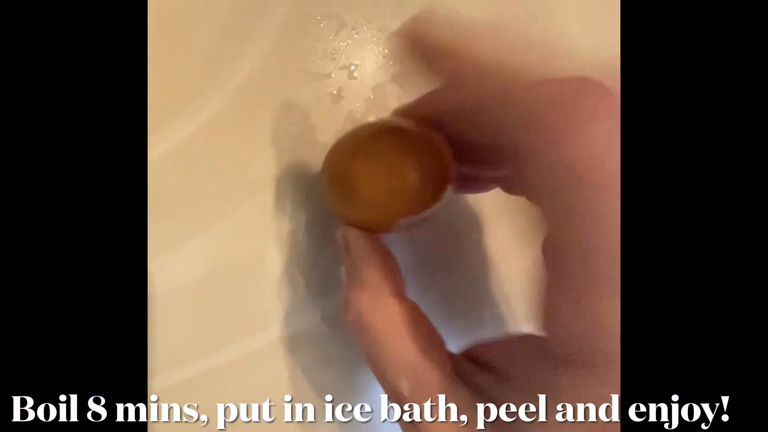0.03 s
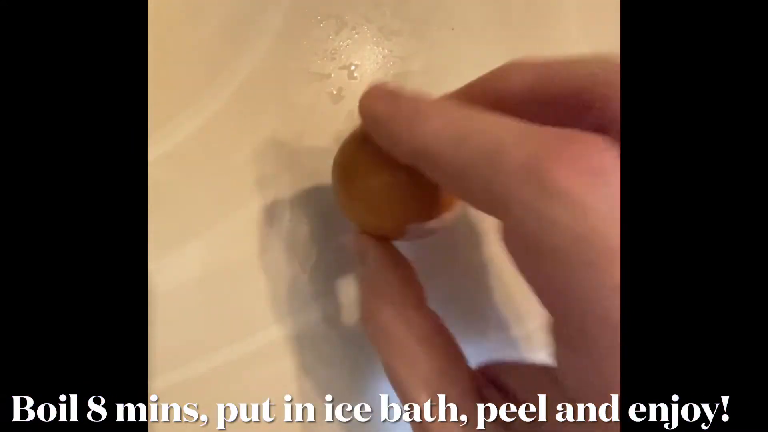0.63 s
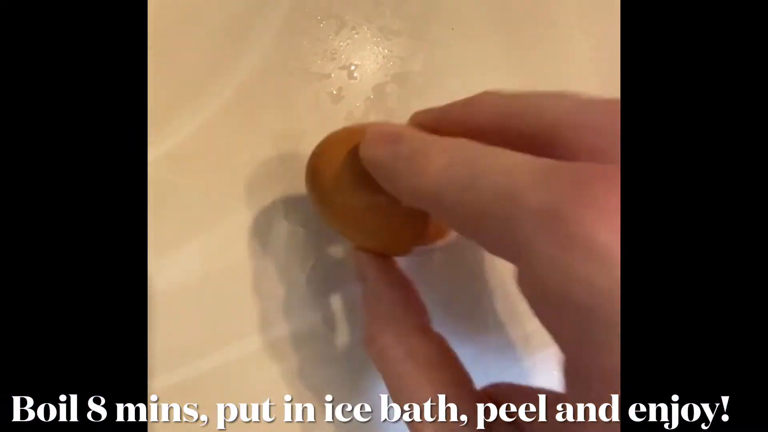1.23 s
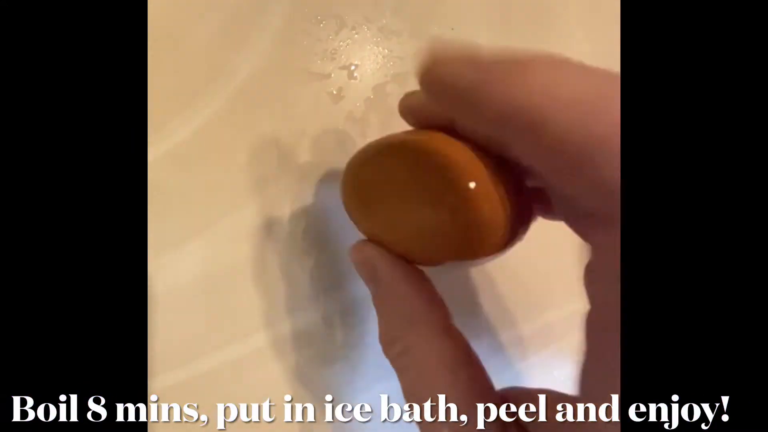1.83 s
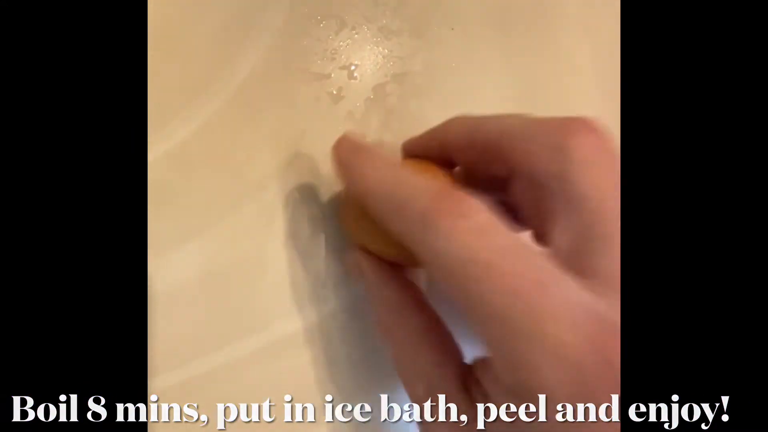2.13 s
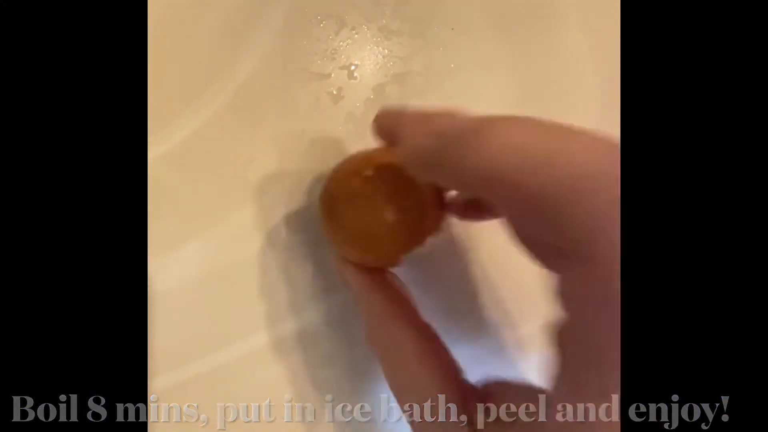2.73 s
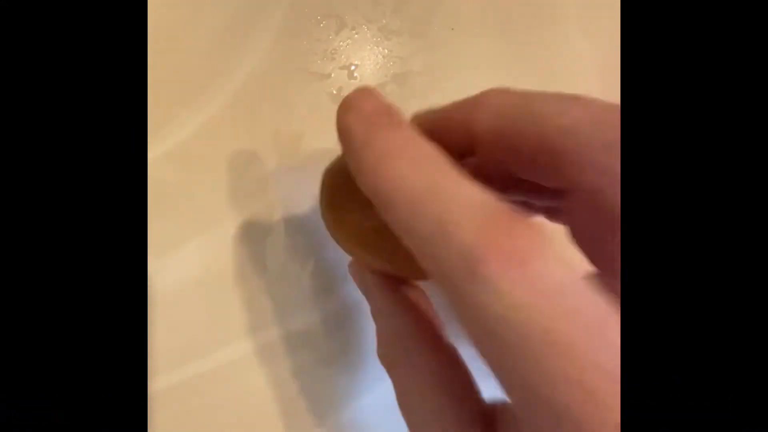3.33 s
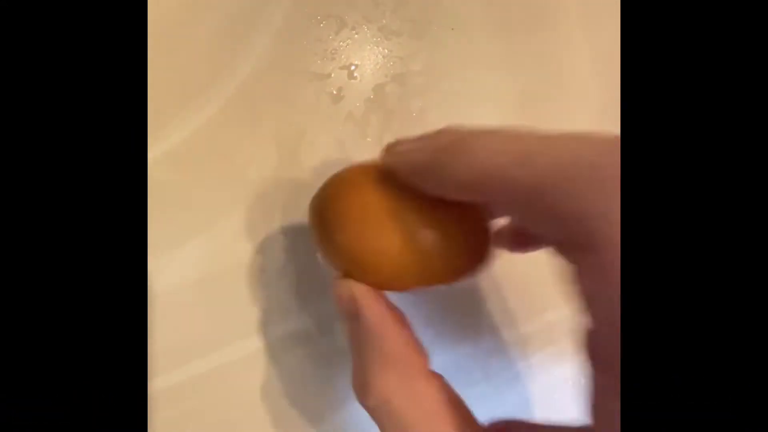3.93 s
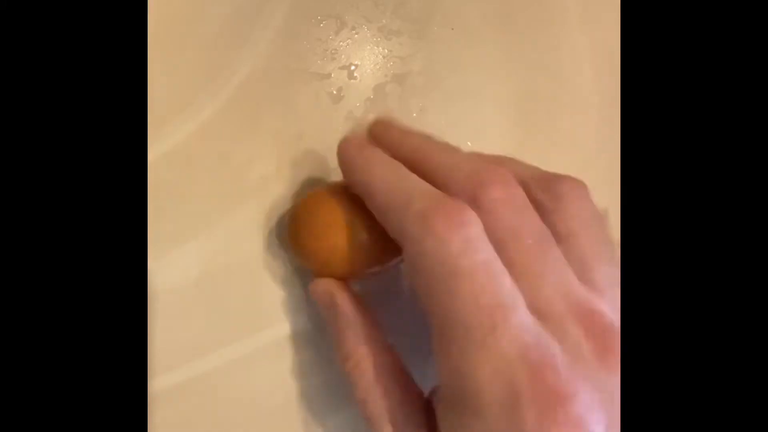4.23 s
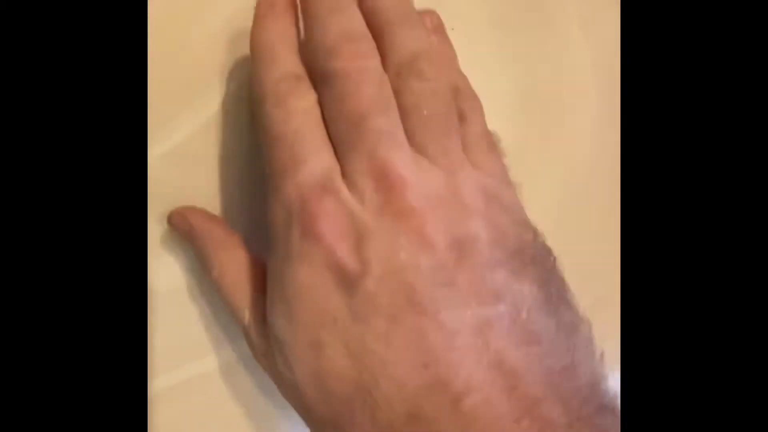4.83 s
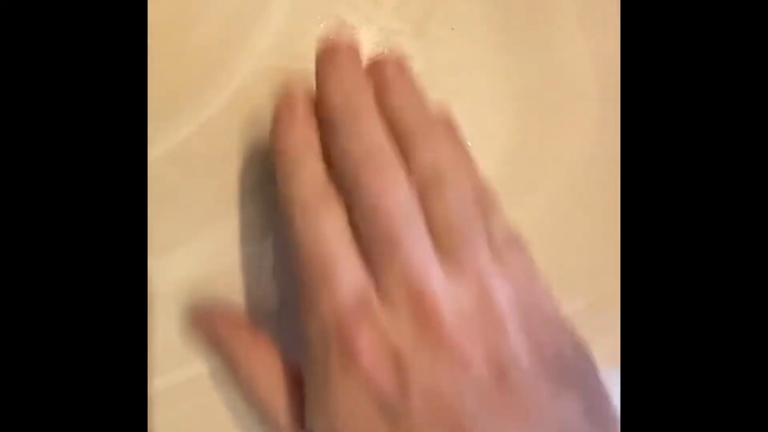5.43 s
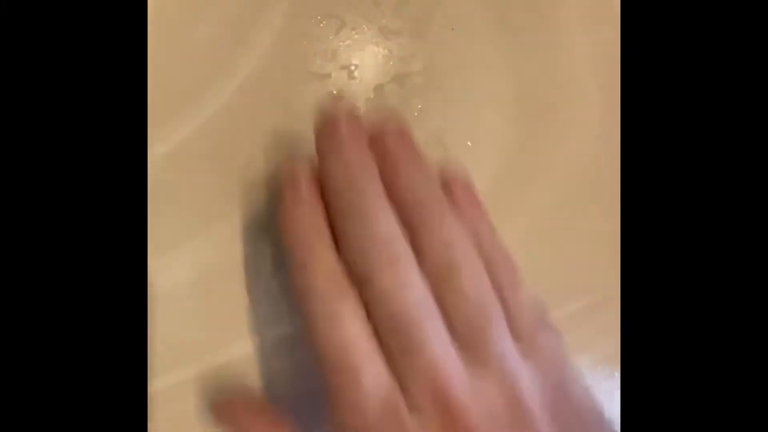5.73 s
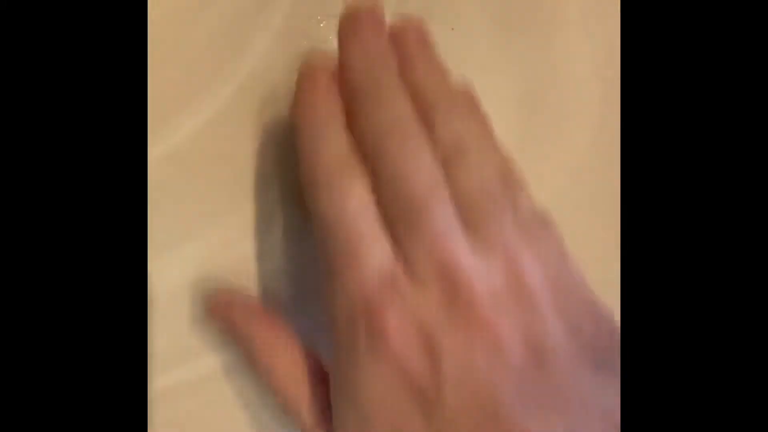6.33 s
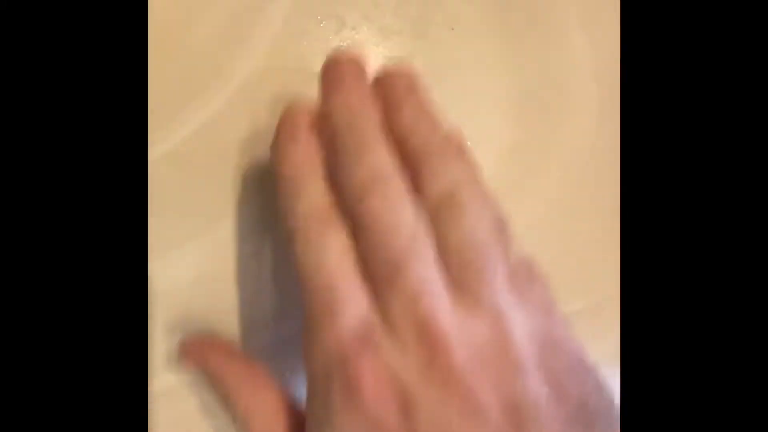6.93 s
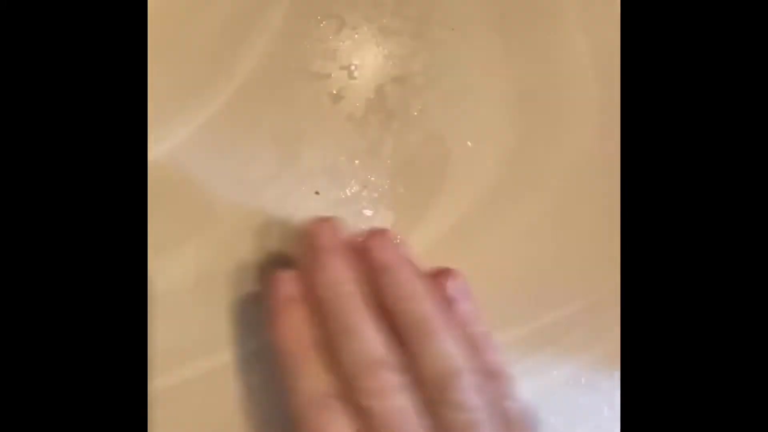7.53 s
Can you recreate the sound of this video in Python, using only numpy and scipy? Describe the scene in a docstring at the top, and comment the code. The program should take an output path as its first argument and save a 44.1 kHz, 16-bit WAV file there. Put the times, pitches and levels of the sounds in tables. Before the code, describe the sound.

A boiled egg is tapped on a stone countertop about five times a second, each tap a sharp crack with a knock and a low thud. The taps soften as the shell gives way. Then a flat hand rolls the egg back and forth, making crisp crunches and small snaps over a faint rumble. It sounds close, with a short kitchen echo and a low hush.

```python
"""Sharp, cracking taps, about five a second, then a rolling crunch: a boiled egg on a stone countertop.
Each tap crushes a patch of shell, knocks on the stone and thuds through the counter.
Once the shell is cracked all over, a flat hand rolls the egg back and forth and breaks it into flakes.
Breaking shell is made of tiny bursts of noise; the knocks and thuds of the taps are fading tones.
A small, hard kitchen echoes it all, over a low, steady hush."""
import sys
import numpy as np
from scipy import signal
from scipy.fft import rfft, irfft, next_fast_len
from scipy.io import wavfile
from scipy.ndimage import uniform_filter1d, map_coordinates

SR = 44100
rng = np.random.default_rng(int(sys.argv[2]) if len(sys.argv) > 2 else 0)


def generate_wav(sig):
    """Save sig (samples, or channels by samples) to the path in sys.argv[1] as 16-bit PCM at SR."""
    pcm = np.round(np.clip(np.atleast_2d(sig).T, -1, 1) * 32767).astype(np.int16)
    wavfile.write(sys.argv[1], SR, pcm)


N = 333837
TIME = np.arange(N) / SR
AGE = np.arange(SR // 3) / SR  # seconds since a hit
PALM_S, PALM_WIDTH_S = 4.506, 0.026  # when the palm settles on the egg, and half the time it takes

# Tone of crunching shell: f/Hz, level/dB
CRUNCH_TONE = [(400, -13), (1000, -2.5), (2200, -3), (3500, 1), (5000, 3), (7500, -0.5), (9500, -6),
               (16000, -28.5)]
# Tone of fine splinters: f/Hz, level/dB
SPLINTER_TONE = [(4000, -27), (7000, 0), (8500, 2), (10300, 2), (13500, 0), (15600, 0.5), (16200, -29)]
# Tone of shell knocking on stone: f/Hz, level/dB
KNOCK_TONE = [(200, -8), (400, -13), (540, 5), (650, 0.5), (800, -18), (1150, -18), (2200, -36.5)]


def taps():
    """In each tap the shell crushes first, the knock follows, and the counter's low thud comes last."""
    # Taps of the egg: t/s, thud/dB, knock/dB, crack/dB, extra treble/dB, shell ring/Hz
    hits = [(-0.03, -21.5, -21.5, -22.5, 3, 4170), (0.1512, -23, -20.5, -21, 2.5, 2970),
            (0.3331, -25.5, -36.5, -25.5, 10.5, 7150), (0.535, -26, -24, -22, 3, 3550),
            (0.7362, -22, -39, -28, 0.5, 3010), (0.9229, -23.5, -21.5, -26, 7.5, 5450),
            (1.109, -21, -17.5, -22, 2.5, 5720), (1.297, -21, -19.5, -25, 5.5, 2490),
            (1.4983, -20, -32, -25, 1, 3280), (1.7048, -28, -30.5, -27.5, 10.5, 7180),
            (1.892, -22.5, -23, -28, 7, 2410), (2.0897, -27.5, -44, -38, 0.5, 6660),
            (2.2726, -24, -27.5, -26, 7, 5250), (2.4535, -21, -23.5, -26, 2, 5560),
            (2.643, -25.5, -31.5, -30.5, 2.5, 5320), (2.8285, -28, -25, -27, 0.5, 3540),
            (3.0247, -24.5, -25, -25, -1.5, 2270), (3.2222, -29.5, -36.5, -28.5, -7, 4640),
            (3.411, -29, -31.5, -23, -1.5, 5370), (3.6018, -32.5, -44, -24.5, -1.5, 2440),
            (3.7817, -34.5, -40, -27.5, 0.5, 5300), (3.9732, -33.5, -43, -24, 2, 3000),
            (4.2392, -45.5, -48, -35, -1.5, 5340)]
    # Tone of the crack: f/Hz, level/dB
    crack_tone = [(300, -29), (750, 7), (1400, 7), (2300, 3), (3500, -0.5), (5500, -0.5), (7500, -0.5),
                  (9000, 0.5), (11000, -4.5), (13500, -1.5), (15200, -2.5), (16500, -23)]
    # Four sets of ringing tones: f/Hz, level/dB, time to fade by 60 dB/s, left over right/dB
    knock_modes = [(549, 9.5, 0.032, -18.5), (616.6, -4, 0.056, -10), (535.9, -22.5, 0.14, 5.5),
                   (677, -12, 0.078, 9)]  # egg on stone
    hand_modes = [(318, 1, 0.045, -25.5), (376.7, -5.5, 0.059, 15.5), (402, -10.5, 0.16, 26.5)]  # hollow of the hand round the egg
    counter_modes = [(80.6, -25.5, 0.22, -18.5), (108.9, 13, 0.041, 4.5), (103.3, -19.5, 0.1, 5.5),
                     (135, -19, 0.3, 6), (169, -19.5, 0.46, 4), (207.6, -19, 0.31, 3),
                     (239.4, -16, 0.37, 4.5), (271.2, -13.5, 0.21, -12.5)]  # low tones of the counter and its cabinet
    slab_modes = [(995, 2, 0.077, 6), (1192, -7, 0.14, -12), (1303, -4, 0.093, 6), (1456, -2, 0.13, -5),
                  (1885, 7, 0.059, -5), (2300, -10.5, 0.19, 1)]  # high tones of the stone slab
    firm_db, firm_crush_s = -23, 0.0023  # a firm tap's thud and crush time
    gives_way_s, giving_s = 3.12, 0.32  # when the shell gives way, and how long that takes
    detune = 0.008
    out = np.zeros((2, N))
    for start, thud_db, knock_db, crack_db, treble_db, shell_hz in hits:
        broken = np.clip((start - gives_way_s) / giving_s, 0, 1)
        force_db = thud_db - firm_db
        crush_s = firm_crush_s * 2 ** min(-force_db / 17.5, 1)  # harder taps crush faster
        clack_db = 0.16 * force_db - 10 * broken  # a broken shell loses its clack
        tilt = [(1800, clack_db), (3000, 0), (7000, 0), (10000, treble_db)]

        def crack_colour(hz):
            caving_patch = 4.9 * bump(hz, shell_hz, octaves=0.15)
            loose_plates = 6.5 * broken * bump(hz, 2176, octaves=0.33)
            return along(crack_tone, hz) + along(tilt, hz) + caving_patch + loose_plates

        breaks = unit_hit(fracture(crush_s, grain_db=1.8, trail_db=-8, trail_t60=0.02))
        crack = amp(crack_db) * stereo(breaks, crack_colour)
        knock = ring(knock_modes, rise_s=0.003, scatter_db=3, detune=detune)
        body = amp(knock_db) * right_late(knock, lag_s=0.00066)
        hand_db = thud_db + 0.33 * (knock_db - thud_db) - 5  # the hand follows both thud and knock
        body += amp(hand_db) * ring(hand_modes, rise_s=0.00046, scatter_db=4, detune=detune)
        thud = amp(thud_db) * ring(counter_modes, rise_s=0.0066, scatter_db=2.5, detune=detune)
        # a broken shell lands softly and thuds deeper
        body += filtered(thud, lambda hz: 1 + broken * amp(1) * resonance(hz, centre=61, q=1.7))
        slab = ring(slab_modes, rise_s=0.0046, scatter_db=8, detune=detune / 2)
        slab *= amp(crack_db + clack_db - 12.5)
        tap = crack + slab + bending_waves(body, lag_s=0.00775)
        add(out, start, kitchen(tap, near_db=11.5, near_t60=0.16, build_s=0.0019))
    return out


def fracture(crush_s, grain_db, trail_db, trail_t60):
    """A run of tiny breaks swells for the crush time, then trails off as the shell settles."""
    t = AGE[:SR // 16]
    swell = (t / crush_s) ** 2 * np.exp(2 * (1 - t / crush_s))
    trail = amp(trail_db - 60 * t / trail_t60) * np.minimum(t / crush_s, 1) ** 2
    unevenness = amp(grain_db * wobble(2540, len(t)))
    breaks = (swell + trail) * unevenness * rng.standard_normal((2, len(t)))
    return np.pad(breaks, [(0, 0), (0, len(AGE) - len(t))])


def ring(modes, rise_s, scatter_db, detune):
    """A struck object's fading tones; each contact point gives them new strengths and shifts them a bit."""
    out = 0
    for hz, db, t60, balance_db in modes:
        wave = np.sin(2 * np.pi * hz * (1 + detune * rng.normal()) * AGE)
        fade = amp(db + scatter_db * rng.normal() - 60 * AGE / t60)
        out = out + sides(balance_db)[:, None] * wave * fade
    onset = 1 - np.exp(-(AGE / rise_s) ** 2)
    return unit_hit(out * onset)


def bending_waves(x, lag_s):
    """The lower a wave, the slower it travels through the slab; lag_s is the delay at 100 Hz."""
    return filtered(x, lambda hz: np.exp(-4j * np.pi * lag_s * np.sqrt(100 * hz)))


def snaps():
    """Larger plates of shell break at once, each with its own ring, and knock lightly on the stone."""
    # Plates giving way: t/s, rough peak level/dB, ring/Hz
    plates = [(2.575, -43.5, 6230), (4.3844, -36, 4660), (4.4789, -21.5, 3420), (4.4901, -19, 5500),
              (4.6922, -28, 4900), (4.8624, -23.5, 6900), (4.9653, -21.5, 5100), (5.0511, -21.5, 3600),
              (5.0814, -22, 3990), (5.2576, -28, 3150), (5.3025, -23.5, 3790), (5.3666, -24, 3460),
              (5.462, -27.5, 3220), (5.526, -26.5, 2320), (5.584, -23, 3870), (5.875, -29, 3320),
              (5.9179, -30.5, 3520), (5.9638, -32, 3530), (6.0122, -23.5, 3340), (6.0172, -32.5, 3350),
              (6.1172, -26.5, 6750), (6.301, -29, 3210), (6.3429, -25, 4600), (6.392, -28, 5280),
              (6.4115, -23, 5250), (6.4443, -32, 2960), (6.5011, -27.5, 5230), (6.6972, -26.5, 4500),
              (6.8174, -33.5, 3830), (6.8412, -25, 4800), (6.914, -23.5, 2970), (7.225, -29, 5200)]
    crest_db = 13  # allowance for a snap's peak above its average level
    shell = lambda hz: np.maximum(along(CRUNCH_TONE, hz), along(SPLINTER_TONE, hz) - 5)
    out = np.zeros((2, N))
    for start, peak_db, plate_hz in plates:
        knock_db = -4 - 12.5 * max(start - PALM_S, 0)  # rolling softens the shell
        breaks = fracture(crush_s=0.0016, grain_db=1.5, trail_db=2, trail_t60=0.07)[:, :SR // 10]
        crack = stereo(breaks, lambda hz: shell(hz) + 7 * bump(hz, plate_hz, octaves=0.2))
        knock = stereo(breaks, lambda hz: along(KNOCK_TONE, hz))
        snap = unit_hit(crack) + amp(knock_db) * unit_hit(knock)
        add(out, start, amp(peak_db - crest_db) * snap)
    return out


def roll():
    """The hand rolls the egg: the shell crunches, splinters, knocks and shakes the counter."""
    # Pushes forth and back: t/s, length/s, crunch/dB, knocking over crunch/dB, flake ring/Hz
    strokes = [(4.389, 0.095, -39, -13.5, 4260), (4.696, 0.13, -36.5, -10.5, 3530),
               (4.906, 0.15, -38, -5.5, 3740), (5.206, 0.14, -36.5, -14.5, 3500),
               (5.446, .15, -39.5, -9.5, 3430), (5.717, .17, -39.5, -16, 3340),
               (5.97, 0.17, -41, -12.5, 3620), (6.269, 0.36, -40.5, -13.5, 4300),
               (6.672, 0.4, -42.5, -13, 4500), (7.126, .135, -42.5, -9.5, 5170),
               (7.225, 0.19, -42, -16, 4000), (7.397, 0.15, -46.5, -10.5, 4940)]
    # Tone of the rolling egg's rumble: f/Hz, level/dB
    rumble_tone = [(25, -12), (55, 7), (85, -9), (120, 19.5), (175, -4), (240, 18), (300, -6.5),
                   (600, -28.5)]
    _, _, full_db, knock_db, ring_hz = np.transpose(strokes)
    pushes = np.array([db + push(start, length) for start, length, db, _, _ in strokes])
    strongest, crunch_db = pushes.argmax(axis=0), pushes.max(axis=0)
    eased_db = full_db[strongest] - crunch_db
    flake_hz = ring_hz[strongest] * 2 ** (-1.43 * eased_db)  # the ring is lower under a light hand
    palm = np.exp(-((TIME - PALM_S) / PALM_WIDTH_S) ** 2)
    rolling = np.clip((TIME - PALM_S) / PALM_WIDTH_S, 0, 1)
    splinters = amp(crunch_db - 5.5)
    knocking = amp(crunch_db + knock_db[strongest]) + amp(-36) * palm
    rumble = amp(-56) * rolling + amp(-43) * palm
    out = amp(crunch_db) * flakes(flake_hz)
    out += splinters * crackle(SPLINTER_TONE, per_s=140, spread_db=4.5, life_s=0.004, bed=0.31)
    out += knocking * crackle(KNOCK_TONE, per_s=230, spread_db=6, life_s=0.0016, bed=0.3)
    out += rumble * crackle(rumble_tone, per_s=210, spread_db=1.5, life_s=0.0085, bed=0.69)
    return out


def push(start, length):
    """Pressure of one push in dB, with 0 as full: the hand leans in, eases off slowly and lets go."""
    lean_s, lean_db, ease_db_per_s, release_db_per_s = 0.078, 12, 7.5, 167.5
    age = TIME - start
    lean = lean_db * np.maximum(1 - age / lean_s, 0) ** 2
    ease = ease_db_per_s * np.maximum(age - lean_s, 0)
    release = release_db_per_s * np.maximum(age - length, 0)
    return -np.minimum(lean + ease + release, 120)


def flakes(flake_hz):
    """Flakes of shell crunch, and their ring glides as new ones come under load."""
    breaks = crackle(CRUNCH_TONE, per_s=700, spread_db=4.7, life_s=0.0022, bed=0.12)
    # every flake has its own pitch: random gains in patches some 300 Hz wide and 25 ms long
    spectra = signal.stft(breaks, nperseg=512)[2]
    patches = uniform_filter1d(rng.standard_normal(spectra.shape[1:]), size=4, axis=0)
    patches = uniform_filter1d(patches, size=5, axis=1)
    crunch = signal.istft(spectra * amp(2.2 * unit(patches)), nperseg=512)[1][:, :N]
    centres = np.geomspace(2300, 6000, 6)
    ringing = 0
    for centre, only_this in zip(centres, np.eye(len(centres))):
        share = np.interp(flake_hz, centres, only_this)  # neighbouring rings fade into one another
        ringing += share * filtered(crunch, lambda hz: resonance(hz, centre, q=2.8))
    return unit(crunch + 1.3 * ringing)


def crackle(tone, per_s, spread_db, life_s, bed):
    """Breaks of very unequal size, each a short burst of noise, over a steady bed of finer ones."""
    sizes = amp(spread_db * np.minimum(rng.exponential(size=N), 3))
    breaks = sizes * (rng.random(N) < per_s / SR)
    power = signal.lfilter([1], [1, -np.exp(-2 / (life_s * SR))], breaks ** 2)
    envelope = np.sqrt(power / power.mean() + bed)
    return unit(stereo(envelope * rng.standard_normal((2, N)), lambda hz: along(tone, hz)))


def grip():
    """Once broken, the shell creaks as the fingers shift on it."""
    # Squeezes of the fingers: t/s, length/s, level/dB
    squeezes = [(3.227, .11, -65.5), (3.42, 0.15, -54.5), (3.582, 0.085, -56)]
    level = sum(amp(db + push(start, length)) for start, length, db in squeezes)
    creak = crackle(CRUNCH_TONE, per_s=300, spread_db=6, life_s=0.0012, bed=0.1)
    return level * unit(filtered(creak, lambda hz: resonance(hz, centre=4700, q=2.1)))


def kitchen(x, near_db, near_t60, build_s):
    """Add quick echoes from the nearby wall and cupboards, then the room's longer tail."""
    # Strength of the echo: f/Hz, level/dB
    echo_tone = [(70, -0.5), (150, -9), (280, -3.5), (550, -10), (1100, -3.5), (3000, -6.5), (7000, -3.5),
                 (10000, -13.5), (16000, -16.5)]
    # Length of the room's tail: f/Hz, time to fade by 60 dB/s
    decay_times = [(100, 0.95), (300, 0.25), (600, 0.37), (1400, 0.51), (5000, 0.45), (14000, 0.34)]
    hz, t, noise = signal.stft(rng.standard_normal((2, len(AGE))), SR, nperseg=128)
    room = amp(-60 * t / along(decay_times, hz)[:, None])
    near = amp(near_db - 60 * t / near_t60)
    fade = np.hypot(room, near) * (1 - np.exp(-(t / build_s) ** 2))
    fade /= np.sqrt(np.mean(fade ** 2, axis=1, keepdims=True) * len(AGE))  # equal energy in each band
    tail = signal.istft(noise * fade, SR, nperseg=128)[1]
    echo = signal.fftconvolve(x, tail, axes=1)[:, :x.shape[1]]
    return x + filtered(echo, lambda hz: amp(along(echo_tone, hz)))


def hush():
    """The low, steady background of the kitchen."""
    # Tone of the background: f/Hz, level/dB
    hush_tone = [(20, -45.5), (50, -3), (120, -0.5), (180, -17), (240, -4.5), (400, -10.5), (800, -25),
                 (1400, -24), (3000, -42.5), (6000, -27), (10000, -40), (16000, -54)]
    return amp(-53.5) * unit(stereo(rng.standard_normal((2, N)), lambda hz: along(hush_tone, hz)))


def stereo(pair, colour_db):
    """Colour two unrelated noises and mix them as a left and a right microphone pick them up."""
    # How alike the two sides are: f/Hz, likeness (1 the same, -1 opposite)
    likeness = [(100, 1), (300, 0.48), (640, -0.79), (1400, -0.24), (3000, 0), (7000, -0.5), (9500, 0.29)]
    # Which side is louder: f/Hz, left over right/dB
    balance = [(60, -3.5), (120, 7), (200, 4.5), (380, 0), (600, -6.5), (1200, 0), (2400, -2.5),
               (4400, -5.5), (8000, -0.5), (12000, -0.5)]
    n = pair.shape[1]
    padded = next_fast_len(n + 1024, real=True)
    hz = np.fft.rfftfreq(padded, 1 / SR)
    angle = np.arccos(np.clip(along(likeness, hz), -1, 1)) / 2
    mid, side = rfft(pair, padded) * amp(colour_db(hz)) * [np.cos(angle), np.sin(angle)]
    left_right = np.array([mid + side, mid - side]) * sides(along(balance, hz))
    return irfft(left_right, padded)[:, :n]


def right_late(pair, lag_s):
    """The sound reaches the right side lag_s seconds after the left."""
    return filtered(pair, lambda hz: np.exp(np.pi * 1j * lag_s * np.array([hz, -hz])))


def sides(balance_db):
    """Left and right gains that keep the total power the same."""
    gains = np.array([amp(balance_db / 2), amp(-balance_db / 2)])
    return gains / np.sqrt(np.mean(gains ** 2, axis=0))


def amp(db):
    """Decibels to gain."""
    return 10 ** (np.asarray(db) / 20)


def unit(x):
    """Scale to an average (rms) level of 1."""
    return x / np.sqrt(np.mean(x ** 2) + 1e-20)


def unit_hit(x):
    """Scale a hit to an average (rms) level of 1 over its first 30 ms."""
    return x / np.sqrt(np.mean(x[..., :SR * 3 // 100] ** 2) + 1e-20)


def along(points, hz):
    """Read between (Hz, value) points on a scale of octaves."""
    freqs, values = np.transpose(points)
    return np.interp(np.log(hz + 1), np.log(freqs + 1), values)


def bump(hz, centre, octaves):
    """A bell curve of height 1 round a centre frequency."""
    return np.exp(-(np.log2((hz + 1) / centre) / octaves) ** 2)


def resonance(hz, centre, q):
    """A ringing filter with gain 1 at its centre; a higher q makes it narrower."""
    return 1 / (1 + 1j * q * (hz / centre - centre / (hz + 1)))


def filtered(x, response):
    """Scale and delay each frequency of x as response(hz) says."""
    n = x.shape[-1]
    padded = next_fast_len(n + 4096, real=True)
    hz = np.fft.rfftfreq(padded, 1 / SR)
    return irfft(rfft(x, padded) * response(hz), padded)[..., :n]


def wobble(per_s, n):
    """A smooth curve of n samples through per_s random points a second."""
    points = rng.standard_normal(int(n * per_s / SR) + 4)
    return map_coordinates(points, [np.arange(n) * per_s / SR])


def add(track, start, sound):
    """Mix a sound in at a start time in seconds."""
    i = round(start * SR)
    part = sound[:, max(-i, 0):N - i]
    track[:, max(i, 0):max(i, 0) + part.shape[1]] += part


def scene():
    """Taps, then the crushing of the shell, in the kitchen."""
    crushing = snaps() + roll() + grip()
    return taps() + kitchen(crushing, near_db=15, near_t60=0.11, build_s=0.0034) + hush()


def record(dry):
    """Thin the deepest bass, share the high treble between the sides and cut off the very top."""
    bass_hz, shared_hz, top_hz = 50, 8200, 16600
    thinned = signal.sosfilt(signal.butter(4, bass_hz, "high", fs=SR, output="sos"), dry)
    treble = filtered(thinned, lambda hz: 0.5 + 0.5 * np.tanh((hz - shared_hz) / 250))
    # both sides carry the left treble, the right one upside down and slightly late
    shared = right_late(np.array([treble[0], -treble[0]]), lag_s=0.000227)
    return filtered(thinned - treble + shared, lambda hz: hz < top_hz)


dry = scene()
out = record(dry)
generate_wav(out)
```